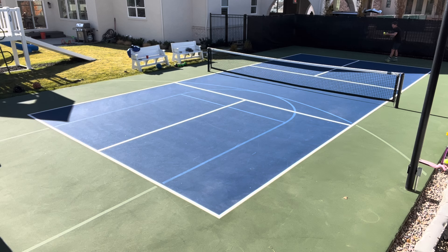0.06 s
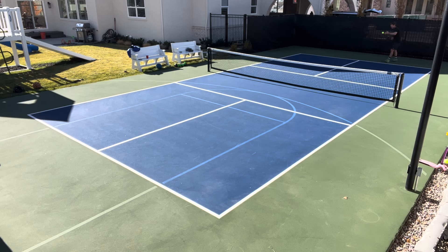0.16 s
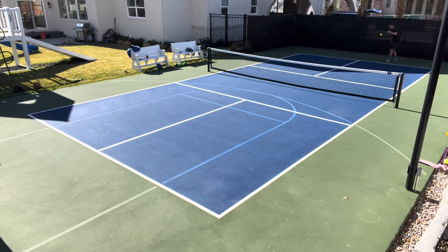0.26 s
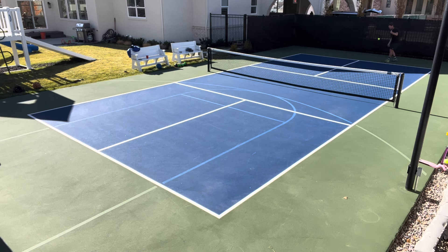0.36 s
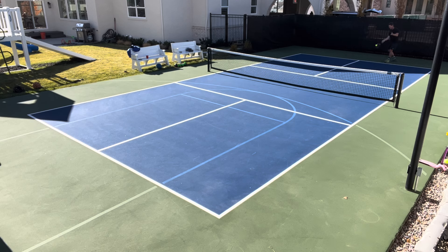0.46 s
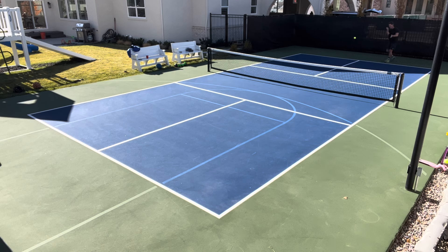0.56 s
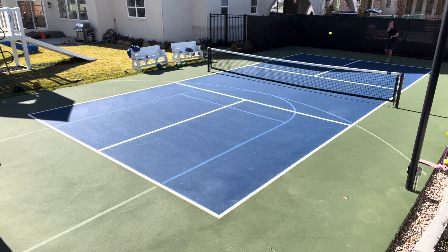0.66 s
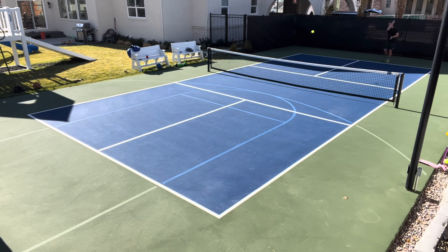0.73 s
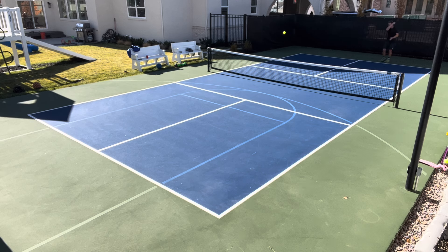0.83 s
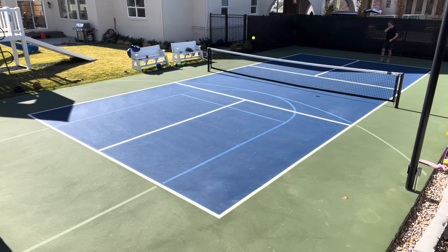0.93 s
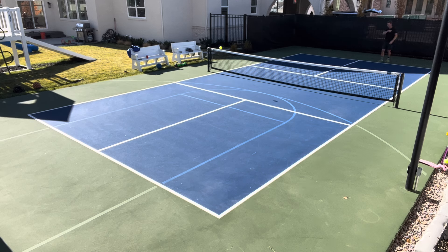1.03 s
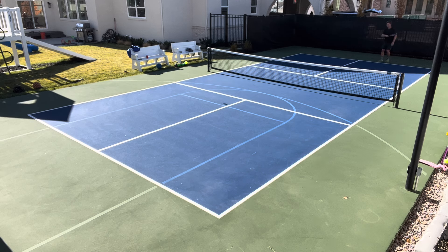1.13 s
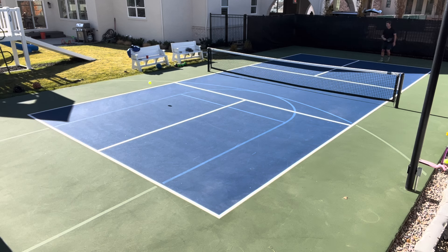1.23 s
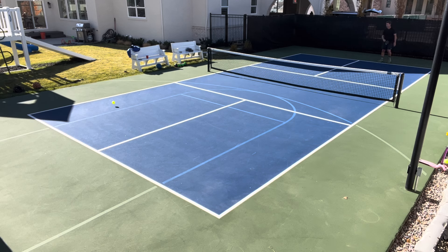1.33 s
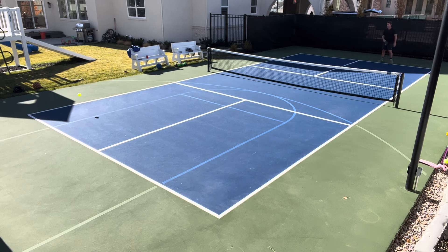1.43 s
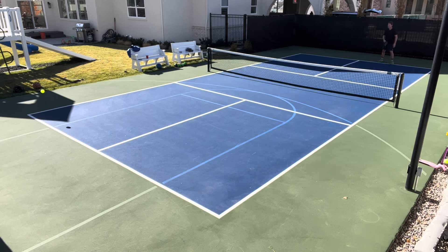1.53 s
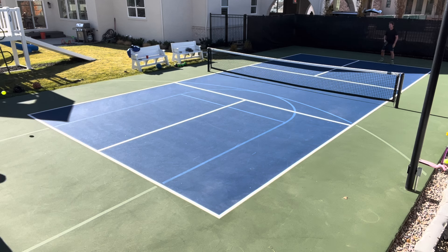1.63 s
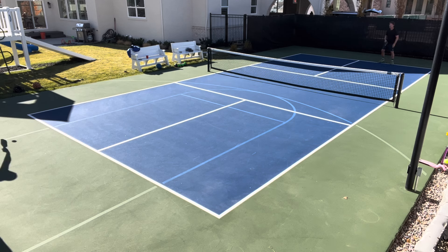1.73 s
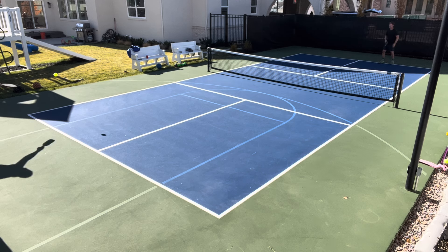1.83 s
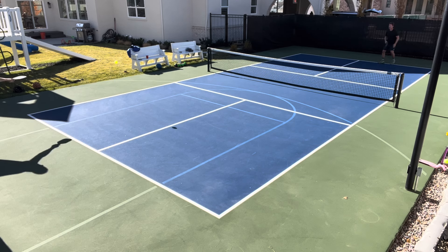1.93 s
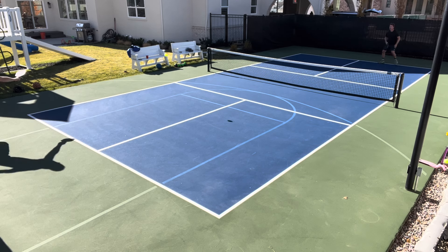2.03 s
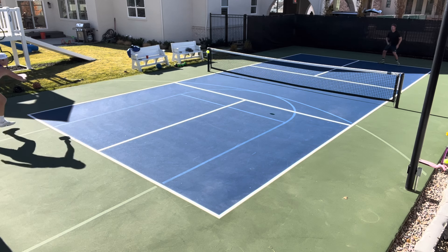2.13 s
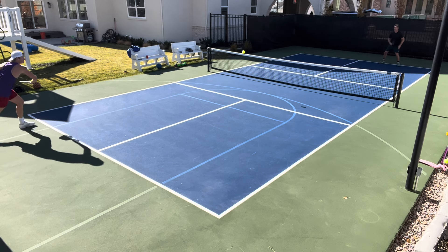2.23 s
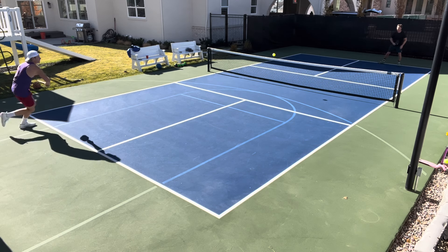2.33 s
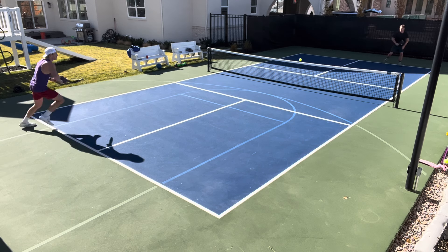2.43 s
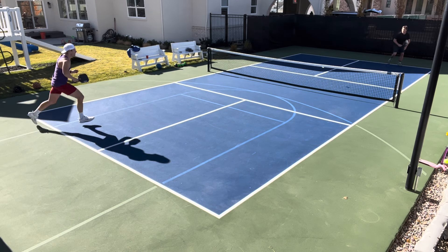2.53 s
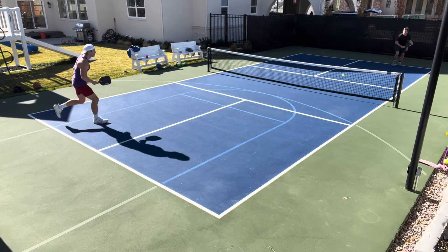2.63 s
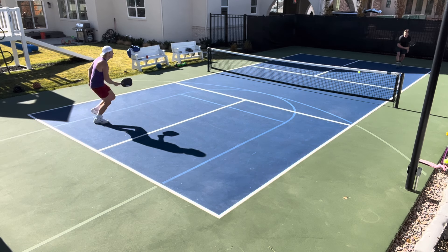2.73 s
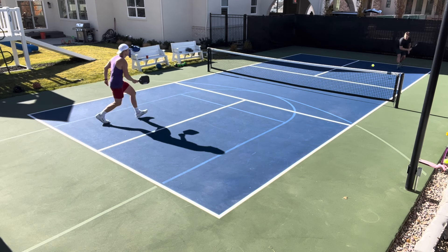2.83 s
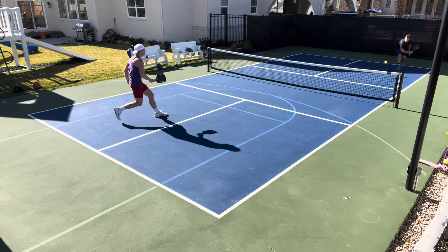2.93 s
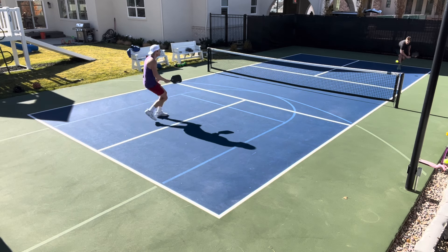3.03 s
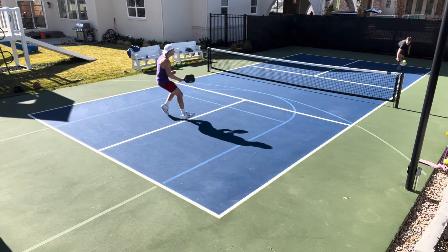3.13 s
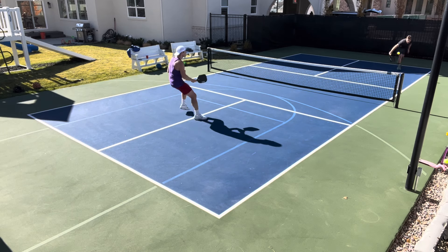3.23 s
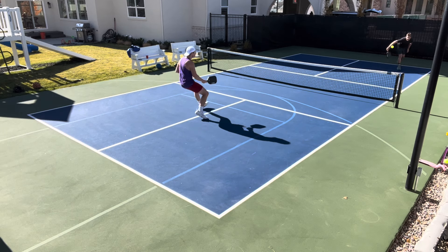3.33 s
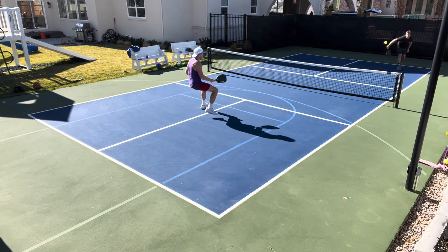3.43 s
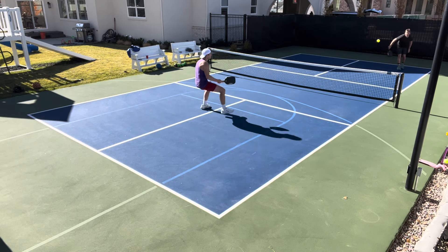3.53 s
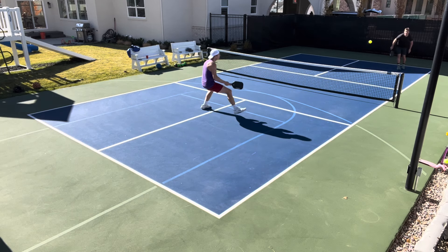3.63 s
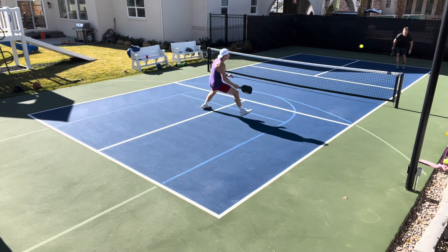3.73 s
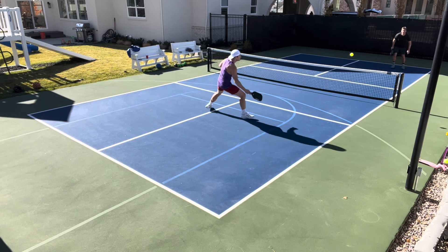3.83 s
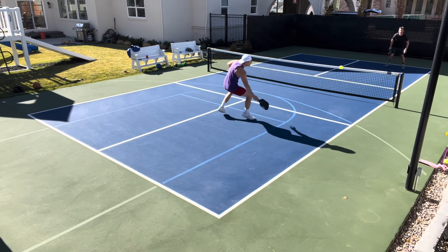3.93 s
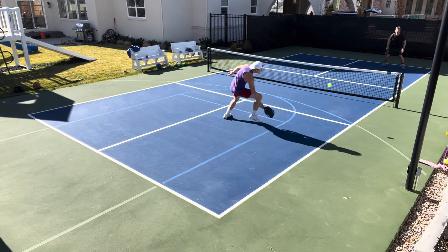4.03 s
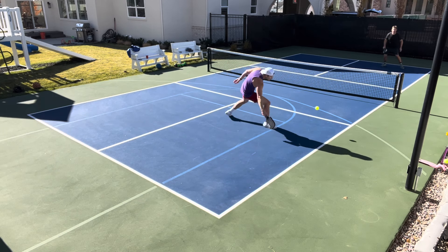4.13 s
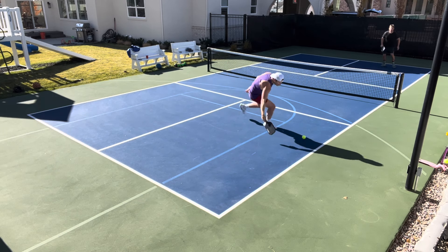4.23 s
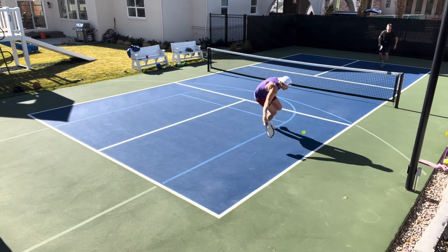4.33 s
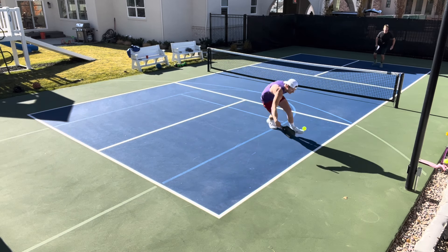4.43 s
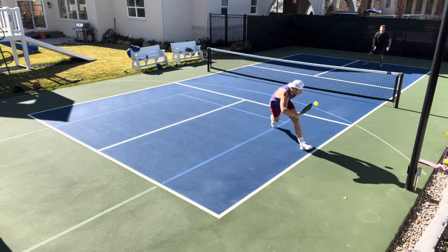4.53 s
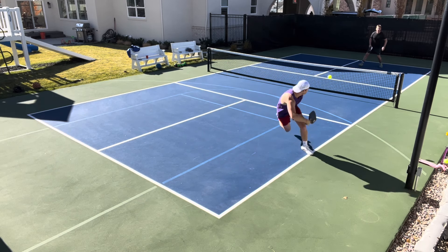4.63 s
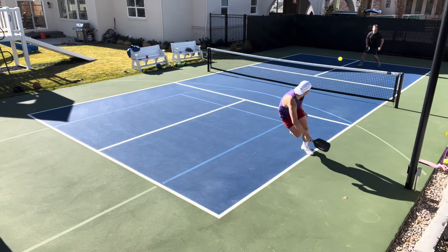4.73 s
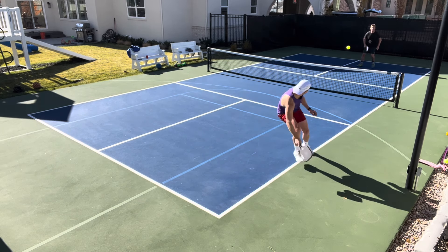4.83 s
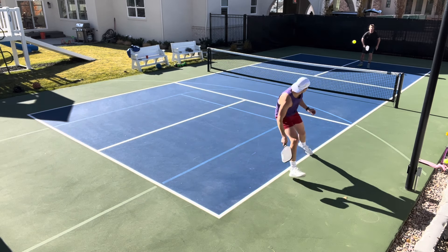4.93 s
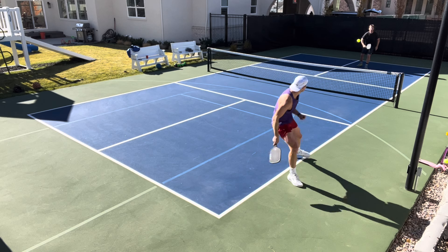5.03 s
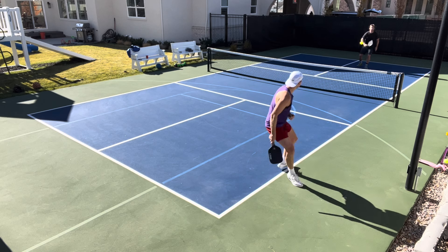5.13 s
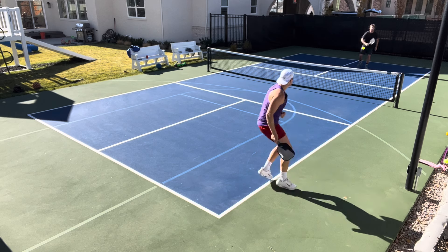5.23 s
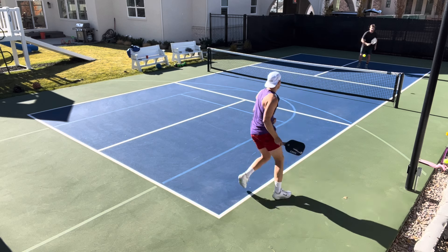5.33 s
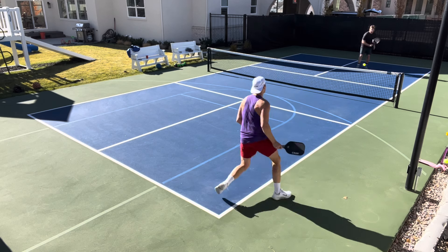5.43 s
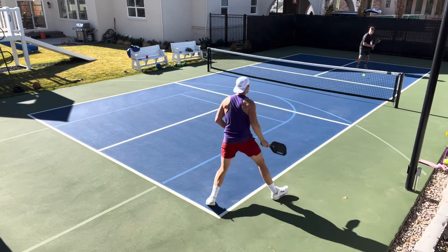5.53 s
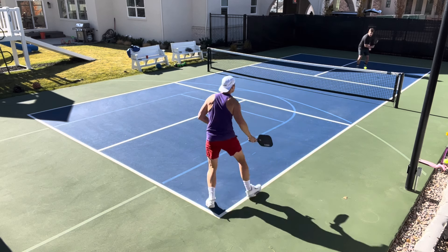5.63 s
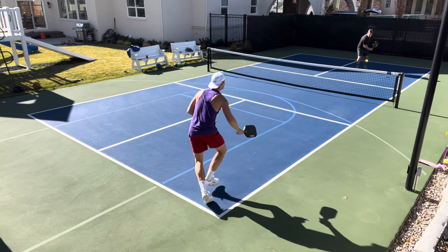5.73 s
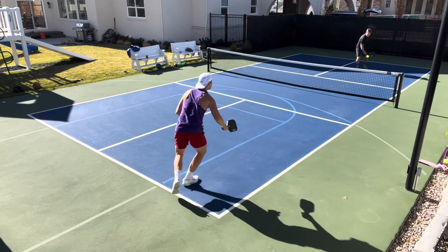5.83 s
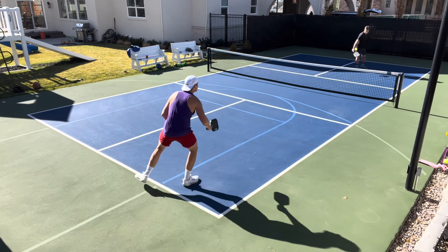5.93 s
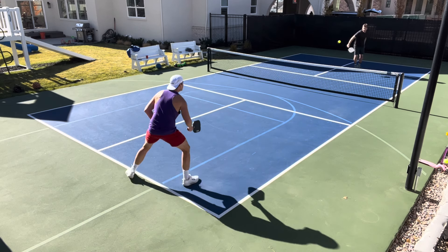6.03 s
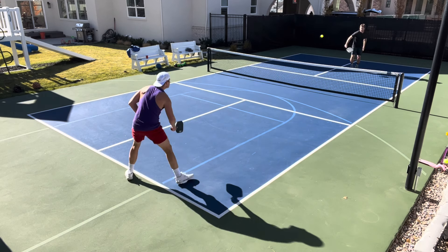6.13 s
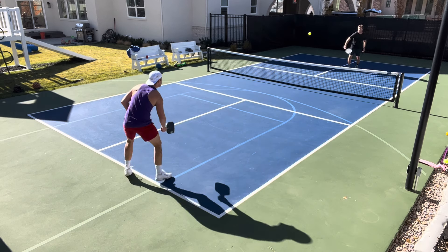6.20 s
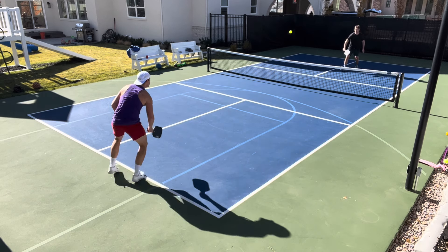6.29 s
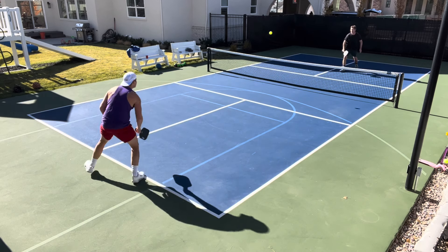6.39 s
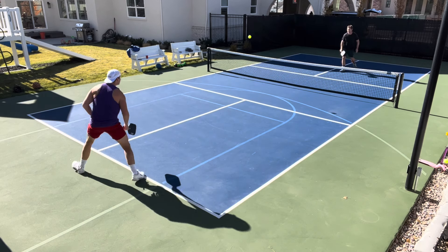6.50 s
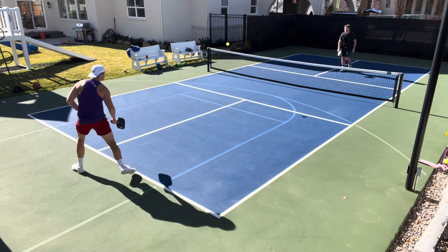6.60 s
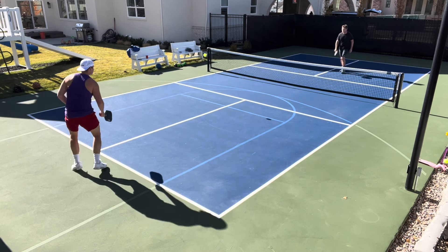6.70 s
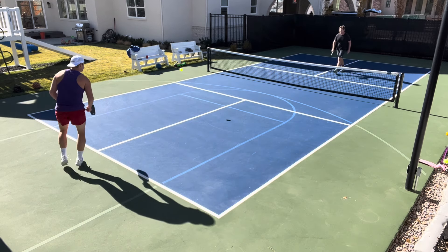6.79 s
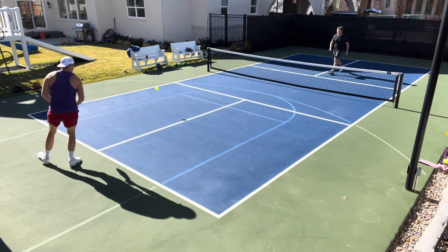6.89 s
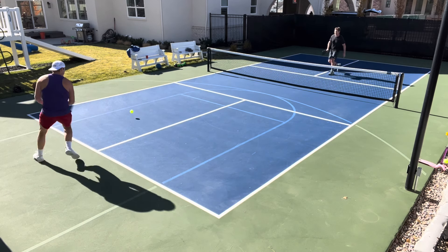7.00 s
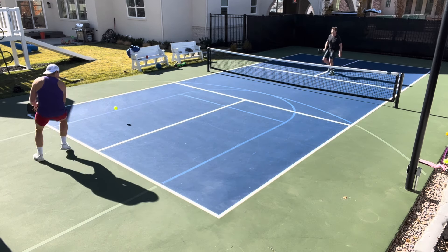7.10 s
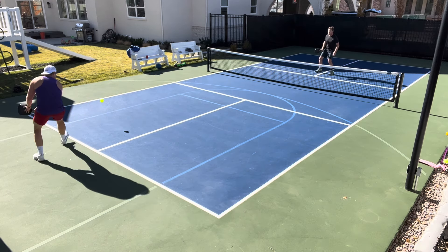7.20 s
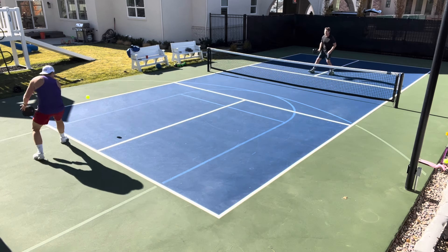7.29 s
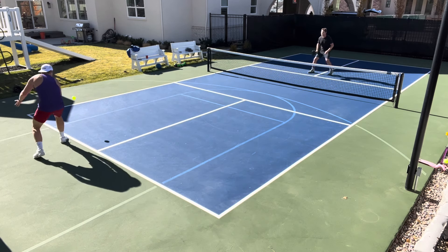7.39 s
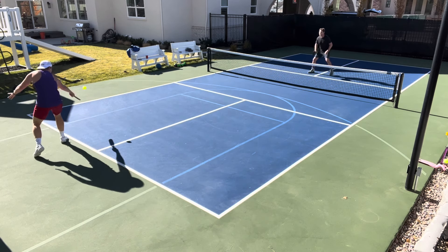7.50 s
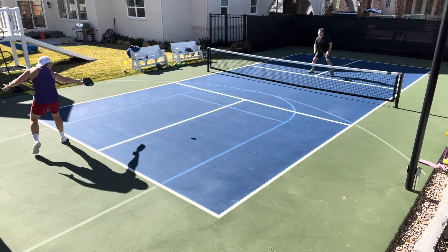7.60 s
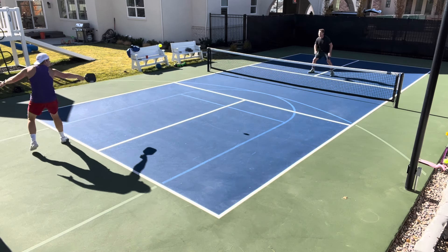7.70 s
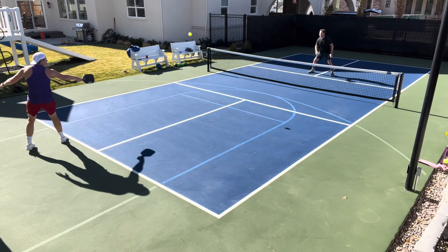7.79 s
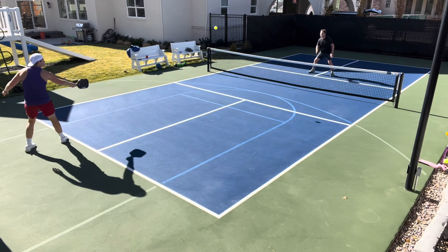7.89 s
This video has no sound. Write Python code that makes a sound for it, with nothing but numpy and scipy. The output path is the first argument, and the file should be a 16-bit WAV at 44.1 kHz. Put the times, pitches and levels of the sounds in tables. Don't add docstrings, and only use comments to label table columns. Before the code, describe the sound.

Low, unsteady distant traffic and a thin hiss run throughout an outdoor hard court between houses. At 0.5 s a loud hollow paddle pop rings in the midrange and bounces back off walls and fences. Faint steps follow, then a bright ball bounce at 1.35 s and a quieter, clickier hit at 1.75 s. Light footfalls approach; a bounce at 2.7 s, a loud pop at 3.2 s with heavy slapping steps and tiny squeaks. Around 4.1 to 4.3 s a strong thudding step, sharp tick and weighty bounce lead to the loudest pop at 4.5 s, another thud close behind. Steps and gritty scuffs patter around 5 s. A bounce at 5.6 s precedes a softer hit at 5.9 s. Quieter shuffling, a clear bounce at 7.05 s, a last softer pop at 7.5 s, and a small late bounce near 7.85 s.

```python
import sys
import numpy as np
from scipy import signal
from scipy.fft import rfft, irfft, next_fast_len
from scipy.io import wavfile
from scipy.ndimage import uniform_filter1d, map_coordinates

SR = 44100
rng = np.random.default_rng(int(sys.argv[2]) if len(sys.argv) > 2 else 0)


def natural_amplitude(level_db):
    exponent = np.asarray(level_db, float) / 20
    return 10 ** exponent


def pcm_store(signal):
    levels = np.round(np.clip(np.atleast_2d(signal), -1, 1) * 32767)
    wavfile.write(sys.argv[1], SR, levels.astype(np.int16).T)


N = 350595
SPAN = np.arange(4096) / SR
BINS = np.fft.rfftfreq(4096, 1 / SR)


def unit(x):
    return x / np.sqrt(np.mean(x ** 2) + 1e-20)


def top(x):
    return x / np.abs(x).max()


def along(points, hz):
    f, v = np.transpose(points)
    return np.interp(np.log(hz + 1), np.log(f + 1), v)


def wobble(knots_per_s):
    knots = rng.standard_normal(int(N * knots_per_s / SR) + 4)
    return map_coordinates(knots, [np.arange(N) * knots_per_s / SR])


def filtered(x, response):
    m = next_fast_len(N + SR // 2)
    return irfft(rfft(x, m) * response(np.fft.rfftfreq(m, 1 / SR)), m)[..., :N]


def add(track, start_s, sound):
    track[..., round(start_s * SR):][..., :sound.shape[-1]] += sound


def rung(modes, order=1):
    response = 0
    for k, (hz, width_hz, db) in enumerate(modes):
        damping = 1j * BINS * width_hz
        resonance = damping / (hz * hz - BINS * BINS + damping)
        response = response + (-1) ** k * natural_amplitude(db) * resonance ** order
    return top(irfft(response))


def nearby(sound, pan_db, spread_db, order):
    taps = np.zeros((2, 360))
    at = rng.integers(30, 360, size=(2, 7))
    signs = rng.choice([-1, 1], size=at.shape)
    np.put_along_axis(taps, at, natural_amplitude(spread_db - 18 * at / 360) * signs, axis=1)
    taps[[0, 1], [max(order, 0), max(-order, 0)]] = 1
    pan_db = np.clip(pan_db, -4, 4)
    return signal.fftconvolve(sound[None], taps, axes=1) * natural_amplitude([[pan_db / 2], [-pan_db / 2]])


# frequency in Hz, level in dB.
CLICK = [(1500, -21), (3500, -13), (7000, -4), (9000, 8.5), (12000, -14), (14500, -13), (16500, -39.5)]


def front():
    return irfft(natural_amplitude(along(CLICK, BINS)))


def crack():
    return top(np.roll(front(), 40) * natural_amplitude(-60 * SPAN / 0.02))


def click(t60_s):
    noise = top(irfft(rfft(rng.standard_normal(len(SPAN))) * natural_amplitude(along(CLICK, BINS))))
    fade = 0.9 * natural_amplitude(-60 * SPAN / 0.006) + 0.2 * natural_amplitude(-60 * SPAN / t60_s)
    return top(crack() + np.roll(noise, 40)[::-1] * fade)


# frequency in Hz, likeness from 0 to 1.
ALIKE = [(60, 0.9), (130, 1), (290, 0.8), (640, 0.085), (3000, 0.0044)]


def rush(spectrum):
    def response(hz):
        turn = np.arccos(np.clip(along(ALIKE, hz), -1, 1)) / 2
        return natural_amplitude(along(spectrum, hz)) * np.array([np.cos(turn), np.sin(turn)])
    mid, side = filtered(rng.standard_normal((2, N)), response)
    return unit(np.array([mid + side, mid - side]))


# time in seconds, rumble level in dB.
TRAFFIC = [(0, -50), (.6, -47.5), (1.399, -53), (1.95, -51.5), (2.699, -53.5), (3.351, -45), (4.25, -55),
           (4.6, -39), (4.9, -55.5), (6.1, -48), (6.8, -46.5), (7.15, -52.5), (7.641, -46.5), (7.95, -48.5)]
# frequency in Hz, level in dB per Hz.
RUMBLE = [(13, -70.5), (32, -33), (44, -11.5), (64, 7), (78, 1), (141, -14), (200, -30), (440, -120)]
TOWN = [(82, -44), (140, -9.5), (230, -13.5), (400, -11.5), (750, -18.5), (1000, -31.5), (2500, -45),
        (5500, -120)]
HISS = [(700, -32), (1300, -1.5), (4000, -11), (6000, -15), (14000, -29), (16500, -51.5)]
HUM_DB, HISS_DB, GUST_DB = -13.5, -31.5, 2
AFTERGLOW_T60_S, GLOW_HUM_DB, GLOW_HISS_DB = 0.61, -32.5, -38
GLOW_GROWS = 0.51


def air(sends):
    level = natural_amplitude(np.interp(np.arange(N) / SR, *np.transpose(TRAFFIC)))
    keep = natural_amplitude(-120 / (AFTERGLOW_T60_S * SR))
    power = (sends ** 2).sum(axis=0)
    glow = signal.lfilter([1 - keep], [1, -keep], power) ** (GLOW_GROWS / 2)
    hum_level = level * natural_amplitude(HUM_DB) + glow * natural_amplitude(GLOW_HUM_DB)
    hiss_level = level * natural_amplitude(HISS_DB) + glow * natural_amplitude(GLOW_HISS_DB)
    rumble = level * natural_amplitude(GUST_DB * wobble(13)) * rush(RUMBLE)
    hum = hum_level * natural_amplitude(GUST_DB * wobble(2.6)) * rush(TOWN) * natural_amplitude([[0.8], [-0.8]])
    hiss = hiss_level * natural_amplitude(GUST_DB * wobble(12)) * rush(HISS)
    return rumble + hum + hiss


# start in seconds, peak in dB, click in dB, thump in dB, ring sent to the yard in dB.
SHOTS = [
    (0.526, -1.5, -23.5, -36.5, -10.5),
    (1.752, -12, -4.5, -26.5, 4.5),
    (3.167, -2.5, -22.5, -44, -7),
    (4.491, -1, -20.5, -29, -16),
    (5.909, -7, -18.5, -26.5, -9.5),
    (7.492, -10.5, -13.5, -37, -11),
]
# frequency in Hz, width in Hz, level in dB.
RINGS = [
    [(334, 98, 10.5), (1069, 150, -2), (1432, 100, 13.5), (1780, 85, 7), (2126, 100, 5), (2640, 400, -8.5),
     (3307, 160, -7.5), (5740, 130, -30), (7240, 110, -44)],
    [(705, 32, -4), (1426, 87, -4.5), (2920, 88, -1), (3950, 310, -13), (4850, 61, -22), (6400, 52, -16),
     (6800, 550, -12)],
    [(410, 330, 10), (970, 79, -2), (1420, 97, 1), (2026, 260, -4.5), (3250, 430, -7.5), (3770, 87, -58.5),
     (6100, 85, -10.5)],
    [(504, 90, -2), (752, 110, -7.5), (1499, 100, -1.5), (2028, 200, -13), (2940, 240, -22),
     (3930, 430, -23.5), (4300, 200, -18.5), (6860, 640, -22.5)],
    [(320.5, 40, -4), (1396, 100, 0.5), (2170, 110, -23.5), (3256, 150, -18.5), (5060, 63, -20),
     (7100, 1000, -21.5), (7640, 100, -63)],
    [(320, 370, -4), (1470, 30, -5.5), (1954, 95, -3), (3370, 124, -9), (3980, 55, -11.5),
     (4770, 210, -2.5)],
]
# frequency in Hz, width in Hz, level in dB.
LINGER = [
    [(440.3, 250, -10.5), (1380, 110, -5.5), (2146, 350, -13), (3167, 520, -14)],
    [(417, 400, -6.5), (735, 97, -9.5), (1550, 260, 5), (2816, 220, 2), (4130, 250, -22)],
    [(400, 37, -2), (780, 130, -7), (1428, 90, -4.5), (2730, 250, -15)],
    [(410, 120, 5.5), (756, 200, 0), (1486, 34, -11), (2020, 31, -32), (4330, 110, -19)],
    [(480, 360, 6.5), (1406, 130, 8.5), (2090, 180, 1), (2470, 67, 3), (3200, 160, -6)],
    [(437, 360, -1.5), (896, 420, -14.5), (1487, 150, -8), (3470, 40, -11.5), (4360, 87, -28)],
]
COURT = [.3, 0.6, 0.2, 0.41, 0.346, 0.12]
COURT_LAG_S = 0.002946
CRACK_DB = 14.5


def lingering(linger, widen, least_hz):
    return rung([(hz, max(widen * width_hz, least_hz), db) for hz, width_hz, db in linger], order=2)


def shots(dry, sends):
    thump = rung([(129, 45, -0.5), (417, 270, -10.5)])
    broad = rung([(500, 7200, -3.5), (1458, 770, 9.5), (3200, 7900, -1), (10200, 4700, 2)])
    for k, (s, db, click_db, thump_db, yard_db) in enumerate(SHOTS):
        modes = [(hz, max(1.6 * width_hz, 170), level_db) for hz, width_hz, level_db in RINGS[k]]
        ring = rung(modes, order=2) + natural_amplitude(thump_db + 15) * thump
        ring = top(ring + COURT[k] * np.roll(ring, round(COURT_LAG_S * SR)))
        snap = natural_amplitude(db + click_db + 19) * click(t60_s=0.01)
        add(dry, s + 0.0022, nearby(natural_amplitude(db) * ring, 0.71, spread_db=-10, order=4))
        add(dry, s + 0.0022, nearby(snap, 0.69, spread_db=-10, order=3))
        returned = lingering(LINGER[k], widen=1.3, least_hz=240)
        sent = natural_amplitude(yard_db - 2) * returned + natural_amplitude(click_db + CRACK_DB) * broad
        add(sends[k % len(sends)], s, natural_amplitude(db) * sent)


# frequency in Hz, t60 in seconds.
YARD = [(100, 2.7), (400, 0.85), (1400, 1.24), (3000, 0.52), (7000, 0.38), (14000, 0.37)]
NEAR_SHARE, NEAR_T60_RATIO = 2.7, 0.073
HOUSES_S, HOUSES_WIDE_S, HOUSES_DB = 0.125, 0.04, 4


def yard(sends):
    noise = rng.standard_normal((len(sends), 2, SR * 3 // 2))
    hz, t, z = signal.stft(noise, SR, nperseg=256)
    lumps = uniform_filter1d(rng.standard_normal((len(sends), 1, 1, len(t))), size=4)
    patches = uniform_filter1d(rng.standard_normal(z.shape), size=4, axis=2)
    patches = uniform_filter1d(patches, size=14, axis=3)
    t60_s = along(YARD, hz)[:, None]
    decay = natural_amplitude(-60 * t / t60_s) + NEAR_SHARE * natural_amplitude(-60 * t / (NEAR_T60_RATIO * t60_s))
    onset = 1 - np.exp(-(t + 0.0014) / 0.0014)
    swell = natural_amplitude(HOUSES_DB * np.exp(-((t - HOUSES_S) / HOUSES_WIDE_S) ** 2))
    tails = signal.istft(z * natural_amplitude(3 * lumps + 18 * patches) * decay * onset * swell, SR, nperseg=256)[1]
    tails /= np.linalg.norm(tails, axis=2, keepdims=True)
    late = np.pad(sends, ((0, 0), (400, 0)))[:, None]
    return signal.fftconvolve(late, tails, axes=2).sum(axis=0)[:, :N]


# start in seconds, peak in dB.
TICKS = [(0.629, -47.5), (1.447, -50), (1.52, -50), (1.8357, -42), (2.7523, -44.5), (3.3773, -46),
         (4.1398, -10.5), (4.2131, -34.5), (4.346, -40), (4.6, -33.5), (5.0071, -28), (5.2979, -34),
         (5.6316, -32), (5.731, -46), (5.94, -40), (7.1524, -52), (7.1806, -34.5), (7.2894, -58),
         (7.59, -24), (7.619, -24)]


def ticks(dry):
    for s, db in TICKS:
        add(dry, s, nearby(natural_amplitude(db) * click(t60_s=0.012), 0.3, spread_db=-6.5, order=0))


# start in seconds, peak in dB, left over right in dB.
RETURNS = [(0.658, -42, 2), (0.68, -32, -0.5), (0.7026, -38.5, -3), (0.78, -57, -4.5), (0.797, -45, -5),
           (0.81, -38.5, 1), (0.878, -43, 0), (.92, -50, -1), (.995, -49.5, 0), (1.06, -52.5, 0),
           (1.7877, -32.5, 4.5), (1.815, -36.5, 0), (1.845, -35.5, 0), (1.8755, -30.5, 6), (1.895, -36, 0),
           (1.915, -38, -6), (1.95, -40, 3), (1.998, -40, 1), (2.065, -36.5, -18), (2.091, -38.5, 7),
           (3.1987, -55, 4), (3.293, -54, 3), (3.4273, -35, 0.5), (3.45, -39.5, 3), (3.468, -36, 1),
           (3.513, -42.5, 0), (3.561, -45.5, 2), (4.516, -33.5, 3.5), (4.609, -31.5, 0.5),
           (4.639, -34.5, 6), (4.694, -38.5, -2), (4.729, -40, 9), (4.804, -43.5, 7), (4.841, -48, 0),
           (5.939, -35.5, 1), (5.98, -36, 0), (6.0447, -43, 5), (6.098, -39.5, -2), (6.1716, -41.5, 4.5),
           (6.2063, -45, 2), (6.331, -50.5, 0), (6.451, -59, -2), (7.5908, -30.5, 3), (7.619, -35.5, 7)]
WALL_HZ, WALL_T60_S = 1612, 0.04


def returns(dry):
    sounds = [lingering(linger, widen=1, least_hz=140) for linger in LINGER]
    shot_starts = [row[0] for row in SHOTS]
    for s, db, pan_db in RETURNS:
        last = np.searchsorted(shot_starts, s) - 1
        facets = rng.standard_normal(1200) ** 3 * natural_amplitude(-60 * SPAN[:1200] / WALL_T60_S)
        facets[0] = 6
        smeared = rfft(sounds[last]) * rfft(facets, len(SPAN))
        dulled = top(irfft(smeared / (1 + 1j * BINS / WALL_HZ) ** 3))
        add(dry, s, natural_amplitude(db + 2.5) * nearby(dulled, pan_db, spread_db=-10, order=4))


# start in seconds, peak in dB, slap in Hz, edge in dB.
HEELS = [(1.077, -49, 245, -7.5), (2.248, -49.5, 406, -1), (2.629, -35, 620, -11), (2.931, -40, 500, -12),
         (2.965, -16, 590, -6), (3.24, -9, 470, 0), (3.399, -18.5, 403, -16), (4.141, -3, 309, -5),
         (4.548, -33, 293, -23), (4.576, -12, 335, -2), (5.007, -25, 310, -5), (5.364, -34.5, 437, -7),
         (5.839, -40, 498, -23.5), (6.059, -27.5, 518, -12), (6.1, -50, 700, -20), (6.19, -46, 950, -30),
         (6.858, -35.5, 334, -14), (7.008, -21, 302, -12.5)]
TOES = [(0.77, -29, 635, -29), (1.215, -33, 333, -10.5), (2.066, -26.5, 700, -21), (3.815, -27.5, 360, -15),
        (3.884, -24, 370, -22), (3.996, -22, 334, -7.5), (4.052, -32, 463, -5.5),
        (4.975, -21.5, 338, -13.5), (4.997, -14.5, 390, -7), (5.294, -28.5, 397, -16),
        (5.498, -21.5, 390, -15.5), (5.815, -23.5, 480, -18), (6.271, -34, 520, -30),
        (6.288, -35, 600, -29), (6.496, -47, 500, -8), (6.557, -36.5, 510, -28), (7.316, -25, 670, -12.5),
        (7.804, -37.5, 735, -27)]
HEEL_THUD_DB, TOE_THUD_DB, MIDDLING_DB = -0.67, -15.5, -30
THUD_LAGS = 0.5
STEP_YARD_DB, FAR_IS_WET = -12.5, 0.073


def steps(dry, sends):
    falls = [(*row, HEEL_THUD_DB) for row in HEELS] + [(*row, TOE_THUD_DB) for row in TOES]
    thud = np.roll(rung([(113, 87.5, 10.5)], order=2), round(0.003 * SR))
    snap = rung([(1870, 3100, 9), (4120, 2200, -7.5)], order=2)
    for k, (s, db, slap_hz, edge_db, thud_db) in enumerate(sorted(falls)):
        slap = rung([(slap_hz, 330, 0), (2 * slap_hz, 600, -8)], order=2)
        grains = rng.standard_normal(300) * natural_amplitude(-60 * SPAN[:300] / 0.015)
        rattle = top(np.convolve(snap, grains)[:len(SPAN)])
        edge = snap + 0.35 * np.roll(rattle, round(0.0015 * SR))
        faint_db = MIDDLING_DB - db
        sound = slap + natural_amplitude(thud_db + THUD_LAGS * faint_db) * thud + natural_amplitude(edge_db + 4) * edge
        sound = natural_amplitude(db) * sound
        add(dry, s + 0.0015, nearby(sound, 2.3, spread_db=-2.5, order=-4))
        add(sends[k % len(sends)], s, natural_amplitude(STEP_YARD_DB + FAR_IS_WET * faint_db) * sound)


# start in seconds, peak in dB, length in seconds.
DRAGS = [(0.774, -55.5, 0.04), (0.87, -57, 0.038), (1.218, -47, 0.064), (1.463, -52, 0.039),
         (1.515, -58.5, .04), (2.747, -52, .061), (3.3794, -41, 0.045), (4.2754, -30.5, 0.022),
         (4.333, -48.5, 0.15), (4.59, -52.5, 0.071), (5.02, -39.5, .013), (6.1945, -47.5, 0.015),
         (6.268, -48, 0.067), (6.843, -45.5, 0.026), (7.1753, -61.5, .041), (7.287, -52.5, 0.058),
         (7.3185, -49, 0.036), (7.351, -52, .04)]
RASPS = [(1.114, -54.5, 0.069), (1.405, -55, 0.041), (2.404, -49.5, 0.1), (3.3228, -56, 0.044),
         (3.6044, -40, 0.06), (4.155, -34, 0.015), (3.852, -44.5, 0.012), (3.902, -53, 0.013),
         (4.002, -39, 0.016), (4.2149, -49, 0.03), (4.689, -53.5, 0.068), (5.038, -34.5, 0.014),
         (5.177, -50, .028), (5.4901, -45, 0.049), (5.6304, -52.5, 0.066), (5.72, -57, 0.12),
         (6.577, -42.5, 0.015), (6.878, -47, 0.032), (6.9895, -52, 0.028), (7.8514, -34, 0.018)]
SKIDS = [(0.979, -51.5, 0.064), (1.378, -45.5, .05), (2.2331, -53, 0.016), (2.8526, -46, 0.023),
         (2.938, -48, 0.02), (4.5382, -35.5, 0.059), (5.3104, -33, 0.029), (6.1511, -49.5, 0.013),
         (6.3623, -43.5, .03), (6.966, -40.5, 0.038), (7.1543, -46, 0.015)]
SQUEAKS = [
    (3.104, -50, 0.018),
    (3.717, -51.5, 0.017),
    (3.735, -49, 0.0054),
    (3.76, -50.5, 0.0082),
    (5.036, -39, 0.027),
    (6.501, -58.5, 0.015),
]
# centre in Hz, width in octaves, fizz in dB, end pitch over start as a ratio.
GRIT = [
    (2900, 2.6, -9.5, 1.5),
    (3580, 1.03, -8, 0.76),
    (7260, 2, -14, 1),
    (2610, 0.087, -38, 1.1),
]


def scuffs(dry, sends):
    strokes = [(*row, *grit) for rows, grit in zip((DRAGS, RASPS, SKIDS, SQUEAKS), GRIT) for row in rows]
    for k, (s, db, length_s, centre_hz, octaves, fizz_db, glide) in enumerate(strokes):
        u = SPAN / np.clip(length_s, 0.004, 0.12) * 3.02
        stroke = (u * np.exp(1 - u)) ** 1.49
        grit = rng.standard_normal((2, len(SPAN))) * natural_amplitude(rng.standard_normal(len(SPAN)))
        fizz = natural_amplitude(along(CLICK, BINS) + fizz_db)

        def rubbed(hz):
            hump = natural_amplitude(-6 * (np.log2((BINS + 1) / hz) / octaves) ** 2)
            return unit(irfft(rfft(grit) * (hump + fizz)))

        slowed = np.clip(u / 3.5, 0, 1)
        texture = (1 - slowed) * rubbed(centre_hz) + slowed * rubbed(glide * centre_hz)
        sound = natural_amplitude(db - 5) * stroke * texture
        add(dry, s - 0.007, sound)
        add(sends[k % len(sends)], s, natural_amplitude(-8) * sound[0])


# start in seconds, peak in dB, knock in dB, low in dB, yard in dB.
BOUNCES = [
    (1.3543, -9.5, -19.5, -36.5, -5.5),
    (2.2323, -36.5, 2, 4.5, 2),
    (2.7149, -17.5, -9.5, -44, -10.5),
    (4.128, -23, 6.5, -8.5, -20),
    (4.2712, -12, -9.5, -12, -25.5),
    (5.5949, -13, -14.5, -35, -10),
    (7.0539, -11, -18, -22, -5),
    (7.2572, -31, -15, -33, -15),
    (7.8525, -23.5, -11.5, -11.5, -12.5),
]
KNOCK_HZ = 370


def bounces(dry, sends):
    knock = rung([(KNOCK_HZ, 200, 0), (1420, 200, -4), (2850, 400, -10)])
    ring = natural_amplitude(-26) * rung([(2880, 380, 0)], order=2)
    low = rung([(115, 33, 0)])
    tick = top(np.roll(front(), 12))
    for k, (s, db, knock_db, low_db, yard_db) in enumerate(BOUNCES):
        sound = natural_amplitude(db) * (click(t60_s=0.011) + natural_amplitude(knock_db) * knock + natural_amplitude(low_db) * low)
        add(dry, s + 0.0028, nearby(sound, 0.29, spread_db=-6, order=3))
        sent = tick + natural_amplitude(knock_db - 4.5) * knock + ring
        add(sends[k % len(sends)], s, natural_amplitude(db + yard_db) * sent)


def scene():
    dry, sends = np.zeros((2, N + SR)), np.zeros((4, N + SR))
    shots(dry, sends)
    ticks(dry)
    returns(dry)
    steps(dry, sends)
    scuffs(dry, sends)
    bounces(dry, sends)
    dry, sends = dry[:, :N], sends[:, :N]
    return dry + yard(sends) + air(sends)


def top_cut(x):
    return signal.sosfilt(signal.butter(12, 16810, fs=SR, output="sos"), x)


# frequency in Hz, lead in half turns.
AHEAD = [(5500, .1), (7000, .4), (8450, .97), (9600, 1.03), (11700, 2), (13100, 2.03), (13800, 2.5),
         (14800, 2.8)]
# frequency in Hz, lead in radians.
LEAD = [(60, 0), (130, .2), (350, .9), (650, 1.9), (1000, .7), (1400, .1), (2000, 0)]
MONO_HZ, SPLIT_HZ = 115, 6300
DIP_HZ, DIP = 9050, 0.6
LATE_CYCLES = 0.75


def record(dry):
    def late(hz):
        return np.exp(-2j * np.pi * LATE_CYCLES * np.log((hz + 40) / 8000))

    def low(hz):
        return 1 / (1 + (hz / SPLIT_HZ) ** 12)

    def bass_path(hz):
        lead = 0.5j * along(LEAD, hz)
        louder = 0.1 / (1 + (hz / 400) ** 2)
        return late(hz) * low(hz) * np.exp((lead + louder) * np.array([[1], [-1]]))

    def treble_path(hz):
        dipped = 1 - DIP * np.exp(-((hz - DIP_HZ) / 800) ** 2)
        lag = np.exp(-1j * np.pi * along(AHEAD, hz))
        return late(hz) * (1 - low(hz)) * dipped * np.array([lag, np.ones(len(hz))])

    side = filtered((dry[0] - dry[1]) / 2, lambda hz: 1 / (1 + (hz / MONO_HZ) ** 3))
    bass = filtered(dry - np.array([side, -side]), bass_path)
    treble = filtered(dry[1], treble_path)
    rising_noise = rng.standard_normal((2, 900)) * np.linspace(0, 1, 900) ** 4.4
    lead_in = signal.fftconvolve(bass, rising_noise / np.linalg.norm(rising_noise[0]), axes=1)[:, 900:][:, :N - 1]
    whole = bass + treble + natural_amplitude(-16) * np.pad(lead_in, ((0, 0), (0, 1)))
    whole /= (1 + np.abs(whole / 0.98) ** 6) ** (1 / 6)
    return top_cut(whole)


dry = scene()
out = record(dry)
pcm_store(out)
```